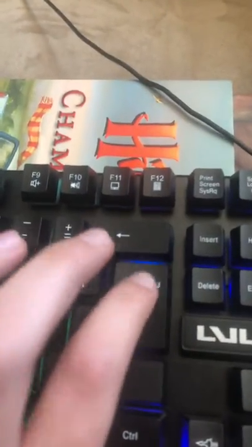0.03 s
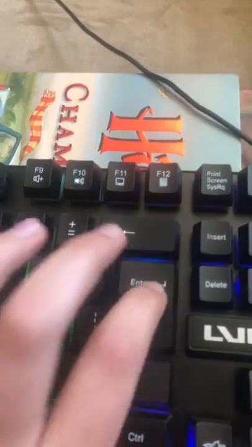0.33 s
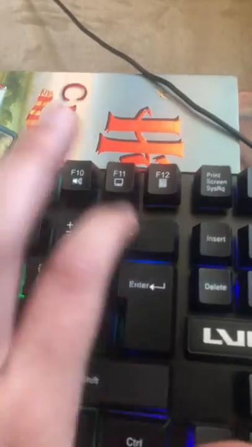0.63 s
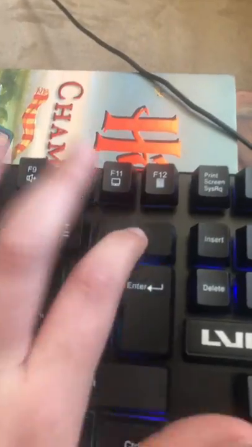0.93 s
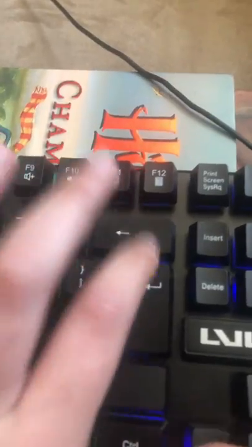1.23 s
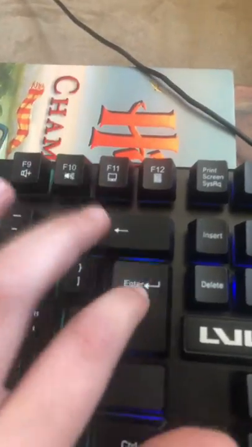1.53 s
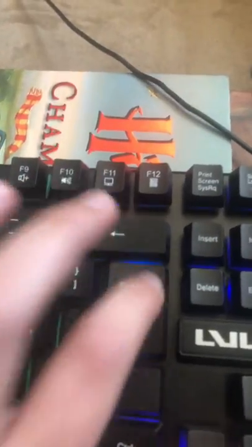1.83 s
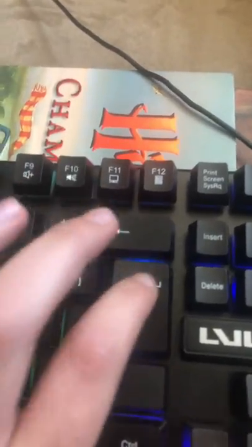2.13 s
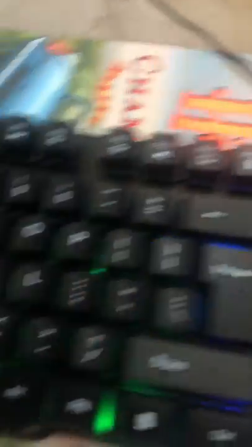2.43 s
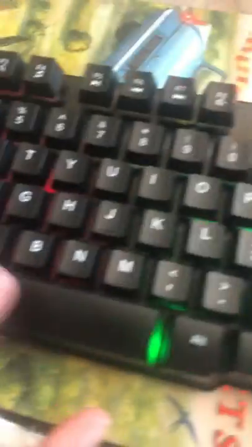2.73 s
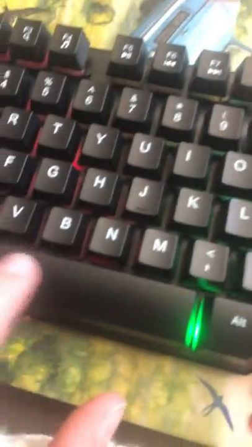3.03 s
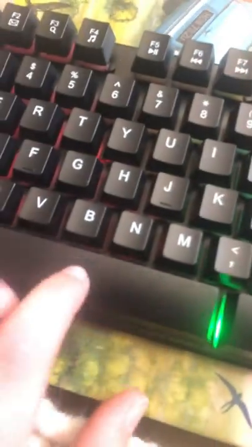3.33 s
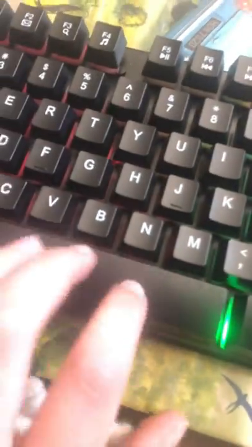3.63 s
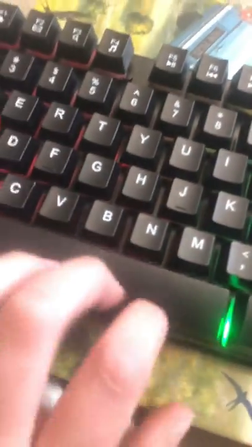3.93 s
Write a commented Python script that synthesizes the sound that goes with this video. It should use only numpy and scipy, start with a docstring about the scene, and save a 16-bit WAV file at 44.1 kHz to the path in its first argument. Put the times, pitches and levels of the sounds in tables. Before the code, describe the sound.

Typing on a plastic keyboard, heard up close in a quiet room. Light clicks of keys going down and springing back come first, then faint handling noise, then quick, sharper space bar clacks with hollow knocks.

```python
"""Close by in a quiet room, fingers tap the keys of a plastic keyboard: each key lands softly on its
rubber dome, then snaps back up against its stop, ringing the cap and the case.
At about 2.3 s the typing ends and a faint, low swell of rubbing and handling noise follows.
From 2.8 s the space bar is struck again and again: its loose bar and stabiliser wire clack and rattle,
the hollow case knocks, and the keyboard thuds on the desk."""
import sys
import numpy as np
from scipy import signal
from scipy.fft import rfft, irfft, next_fast_len
from scipy.io import wavfile

SR = 44100
rng = np.random.default_rng(int(sys.argv[2]) if len(sys.argv) > 2 else 0)


def transcribe(signal):
    """Save signal, clipped to [-1, 1], as a 16-bit WAV file at the path in sys.argv[1]."""
    frames = np.atleast_2d(signal).T
    limited = np.clip(frames, -1, 1)
    pcm = np.round(limited * 32767).astype(np.int16)
    wavfile.write(sys.argv[1], SR, pcm)


N = 176400
T = np.arange(SR // 4) / SR  # time axis of one hit [s]

# noise colours of the room tone and the handling noise (frequency [Hz], level [dB])
AIR_SPECTRUM = [(24, -32), (40, -8), (130, -2.5), (412, -11), (680, -11.5), (1270, -19), (2300, -24.5),
                (3930, -22), (16000, -33.5)]
RUSTLE_SPECTRUM = [(60, -4), (140, 8), (600, -2), (2000, -8), (12000, -25)]
# fader curve of the handling noise (time [s], level [dB])
RUSTLE_CURVE = [(2.299, -70), (2.36, -66.5), (2.45, -64.5), (2.58, -72.5), (2.8, -77)]
# early echoes off nearby surfaces (delay [s], level [dB])
EARLY_ECHOES = [(.0102, -15), (.0172, -15)]
# decay of the room (frequency [Hz], t60 [s])
ROOM_DECAY = [(500, 0.17), (2000, 0.28), (5000, 0.25), (14000, 0.22)]

# noise colours of the contacts on case, key, bar and wire (frequency [Hz], level [dB])
HOLLOW_SPECTRUM = [(250, 1), (500, 0), (750, 1), (900, -7.5), (1180, 0.5), (1450, -7), (1700, -1.5),
                   (2600, -22.5)]
KEY_TICK_SPECTRUM = [(1000, -5.5), (2100, -3.5), (2800, 2.5), (4500, 0), (6000, -10), (7500, -7),
                     (9000, -17.5), (12500, -18.5), (16000, -24)]
BAR_CRACK_SPECTRUM = [(1200, -15), (2100, -14.5), (2850, 5), (3250, -8), (3800, -1), (4800, -2),
                      (5500, -21.5), (7000, -19.5)]
WIRE_TICK_SPECTRUM = [(3500, -19), (5500, 11.5), (7500, 6.5), (9300, 2), (10500, -4.5), (13800, 1.5),
                      (16000, -29.5)]
# modes of a keycap's body, its thin rim, the space bar and its wire (frequency [Hz], level [dB], t60 [s])
CAP_MODES = [(1275, -1.5, 0.01), (1468, 0.5, 0.0091), (1835, -8.5, 0.0032)]
RIM_MODES = [(2595, 4.5, 0.0136), (3574, 6, 0.018), (4296, 6.5, 0.011), (6010, -1.5, 0.035),
             (7540, -4, 0.042)]
BAR_MODES = [(2596, -5, 0.037), (2883, -0.5, 0.015), (3630, 3, 0.017), (4050, 3, 0.022), (4370, -2, .03),
             (4806, 1.5, 0.034), (5090, -17, 0.054)]
WIRE_MODES = [(5350, -16, 0.13), (9270, 5, 0.032), (13600, 6, 0.033)]

# Cue lists: levels are before each layer's own trim.
# the keyboard bumping the desk (time [s], level [dB], pitch [Hz])
DESK_BUMPS = [(1.34, -53.5, 157), (3.164, -55.5, 129), (3.53, -50.5, 110), (3.68, -47, 85),
              (3.826, -47.5, 84), (3.976, -48, 140.5)]
# the space bar reaching either end of its travel (time [s], level [dB], pitch [Hz], hollow knock [dB])
CASE_THUDS = [(3.148, -49.5, 338, -77), (3.169, -60, 280, -57), (3.2158, -43, 330, -50),
              (3.355, -57, 284, -57.5), (3.419, -41.5, 297, -46), (3.513, -49.5, 310, -52),
              (3.537, -44, 320, -47), (3.572, -43.0, 310, -51), (3.669, -51.5, 234, -51),
              (3.7161, -40, 314, -48.5), (3.821, -44, 223, -38), (3.868, -39, 314, -45.5),
              (3.9713, -45.5, 186, -37)]
# keys landing (time [s], cap [dB], case [dB], thump [dB], tick [dB], case pitch [Hz], cap pitch [Hz])
KEY_PRESSES = [(0.1351, -63, -53.5, -58.5, -63.5, 674, 1570), (0.3067, -57, -47, -54, -61, 572, 1380),
               (0.5551, -46, -50, -56, -56.5, 698, 1307), (0.7634, -49.0, -52, -54, -56.5, 722, 1240),
               (0.9369, -56, -55, -55.5, -63, 676, 1220), (1.552, -60, -55.5, -64, -62, 670, 1440),
               (1.7458, -62.5, -50, -57.5, -61.5, 657, 1550), (1.917, -56, -51, -57, -64.5, 586, 1730),
               (2.073, -60, -53, -59.5, -66, 645, 1490), (2.232, -65, -61.5, -73, -72, 714, 1300)]
# a loose cap rattling as its key moves (time [s], level [dB])
CAP_RATTLES = [(0.333, -62.5), (0.5603, -54), (0.8315, -65)]
# keys springing back (time [s], cap [dB], case [dB], thump [dB], tick [dB], case pitch [Hz],
# cap pitch [Hz], snap pitch [Hz], contact time [s])
KEY_RELEASES = [(0.029, -47.5, -54.5, -55, -60.5, 750, 1410, 2460, 0.00089),
                (0.202, -48, -45.5, -50, -60.5, 656, 1464, 3200, 0.00027),
                (0.39, -47, -46, -49, -57, 660, 1490, 2700, 0.00034),
                (0.661, -49, -43.0, -60.5, -54.5, 666, 1290, 3000, 0.00068),
                (0.841, -40.5, -43.5, -57, -52.5, 680, 1376, 2750, 0.0024),
                (1.0185, -48, -43.5, -59.5, -57, 676, 1435, 2700, 0.001),
                (1.097, -45, -44.5, -52, -52.5, 605, 1526, 5750, 0.00061),
                (1.1871, -47, -42.5, -54, -55.5, 705, 1410, 3130, 0.00082),
                (1.634, -44.5, -50.5, -49.5, -58, 825, 1490, 2420, 0.00021),
                (1.8142, -49.0, -49.5, -52.5, -61, 567, 1520, 4600, 0.00023),
                (1.9907, -49, -49, -51.5, -58.0, 730, 1480, 3600, 0.00024),
                (2.1541, -47.5, -47, -50.5, -59, 697, 1540, 3120, 0.0004),
                (2.268, -59.5, -65, -68, -70.5, 744, 1385, 2930, 0.0011),
                (2.3246, -44, -44, -53.5, -54.5, 620, 1490, 2510, 0.00031)]
# space bar contacts (time [s], bar [dB], wire [dB], strongest ring [Hz])
BAR_CLACKS = [(2.829, -44.5, -55.5, 4070), (2.8348, -51, -69, 3690), (2.85, -51.5, -70, 2900),
              (2.8545, -52.5, -69.5, 3050), (2.8595, -50.5, -64, 3990), (2.926, -58, -69, 2940),
              (2.948, -53.5, -80, 3680), (2.989, -65, -82, 3530), (3.1433, -37, -53.5, 3000),
              (3.159, -46, -57, 2800), (3.1704, -59, -66, 2840), (3.2147, -52, -60, 4200),
              (3.222, -43.5, -58, 3960), (3.231, -53, -58, 3640), (3.3507, -43.5, -49.5, 4670),
              (3.357, -44.5, -64, 4700), (3.364, -46, -57, 4250), (3.3789, -51.5, -67, 2900),
              (3.418, -43.5, -51.5, 3960), (3.4246, -38.5, -50.5, 2950), (3.4438, -46.5, -60, 3580),
              (3.51, -38, -56, 2920), (3.516, -43, -58, 2990), (3.5349, -32, -45.5, 2810),
              (3.543, -46, -48.5, 3980), (3.549, -50, -56, 3730), (3.572, -46.5, -48.5, 4070),
              (3.5775, -43, -52.5, 4740), (3.6216, -57.5, -68, 3740), (3.6661, -31, -48.5, 2967),
              (3.676, -58, -51, 2760), (3.7016, -45.5, -54, 2870), (3.719, -42.5, -49.5, 4720),
              (3.726, -45.5, -56, 4700), (3.757, -59, -72, 3730), (3.8145, -31, -47.5, 4534),
              (3.82, -32.5, -49, 4150), (3.8522, -51, -59, 3700), (3.8663, -46.5, -53.5, 4460),
              (3.8801, -47, -57, 4630), (3.9343, -58.5, -71, 3760), (3.965, -36, -46, 4070),
              (3.9696, -24, -42.5, 3730), (3.9763, -38, -55, 4770), (3.987, -50, -56, 4240)]

CAP_MODES_HZ = 1442  # pitch of the untransposed keycap
DOWN_THUMP_HZ, UP_THUMP_HZ = 160.6, 405
SLIDE_S = .01  # scrape leading into a contact


def amp(db):
    """Decibels to gain."""
    return 10 ** (np.asarray(db) / 20)


def along(points, hz):
    """Read a (frequency, value) curve on a log frequency axis."""
    freqs, values = np.transpose(points)
    return np.interp(np.log(hz + 1), np.log(freqs + 1), values)


def noise(spectrum, size):
    """Coloured noise of rms 1."""
    colour = amp(along(spectrum, np.fft.rfftfreq(size, 1 / SR)))
    x = irfft(rfft(rng.standard_normal(size)) * colour, size)
    return x / x.std()


def unit_hit(x):
    """Scale a short sound to the energy of 10 ms at rms 1."""
    return x * np.sqrt(.01 * SR / (np.sum(x * x) + 1e-20))


def add(track, at, x):
    """Mix x into the track at a time in seconds."""
    i = max(round(at * SR), 0)
    track[i:i + len(x)] += x[:max(N - i, 0)]


def envelope(rise, t60):
    """Attack and exponential decay, both in seconds."""
    return (1 - np.exp(-T / rise)) * amp(-60 * T / t60)


def ring(hz, rise, t60):
    """One damped mode; the longer the contact, the softer its attack and the purer its tone."""
    attack = 1 - np.exp(-(T / rise) ** 2)
    return unit_hit(np.sin(2 * np.pi * hz * T) * attack * amp(-60 * T / t60))


def chime(modes, rise, scatter_db, detune):
    """An object's modes, their balance and pitch a little different at each touch."""
    out = np.zeros(len(T))
    for hz, db, t60 in modes:
        level, polarity, pitch = rng.standard_normal(3)
        out += amp(db + scatter_db * level) * np.sign(polarity) * ring(hz * (1 + detune * pitch), rise, t60)
    return unit_hit(out)


def burst(spectrum, rise, t60, chatter_db, chatter_t60):
    """A crack of noise followed by weaker, grainy chatter."""
    knots = T[::64]
    grain_db = 7 * np.interp(T, knots, rng.standard_normal(len(knots)))
    chatter = amp(chatter_db + grain_db) * envelope(rise, chatter_t60)
    return unit_hit(noise(spectrum, len(T)) * (envelope(rise, t60) + chatter))


def slide(spectrum):
    """A short scrape that swells up to a contact."""
    size = int(SLIDE_S * SR)
    return unit_hit(noise(spectrum, size) * np.linspace(0, 1, size) ** 3)


def room_tone():
    """A bed of still room air."""
    return amp(-69.5) * noise(AIR_SPECTRUM, N)


def room(x, wet_db):
    """Add a short diffuse tail that lingers longest in the upper mids."""
    hz, t, bins = signal.stft(rng.standard_normal(SR // 2), SR, nperseg=256)
    decay = amp(-60 * t / along(ROOM_DECAY, hz)[:, None])
    onset = 1 - np.exp(-t / .0015)
    tail = signal.istft(bins * decay * onset, SR, nperseg=256)[1]
    return x + amp(wet_db) * signal.fftconvolve(x, tail / np.linalg.norm(tail))[:N]


def early_echoes(x):
    """Nearby surfaces throw back the bright part of the sound."""
    bright = signal.sosfilt(signal.butter(1, 800, 'high', fs=SR, output='sos'), x)
    out = x.copy()
    for delay, db in EARLY_ECHOES:
        add(out, delay, amp(db) * bright)
    return out


def handling_rustle():
    """A faint, low swell of rubbing and handling noise after the typing ends."""
    times, levels = np.transpose(RUSTLE_CURVE)
    fader_db = np.interp(np.arange(N) / SR, times, levels, left=-np.inf, right=-np.inf)
    return amp(fader_db) * noise(RUSTLE_SPECTRUM, N)


def desk_bumps():
    """The low end: the whole keyboard rocks softly on the desk."""
    out = np.zeros(N)
    for at, db, hz in DESK_BUMPS:
        add(out, at, amp(db - 2) * ring(hz, rise=.0045, t60=.15))
    return out


def case_thuds():
    """The space bar knocks on the hollow case, which hums briefly."""
    out = np.zeros(N)
    for at, db, hz, knock_db in CASE_THUDS:
        knock = burst(HOLLOW_SPECTRUM, rise=.0003, t60=.019, chatter_db=-15, chatter_t60=.11)
        hum = ring(hz, rise=.0016, t60=.019) + amp(-7) * ring(1.336 * hz, rise=.00072, t60=.016)
        add(out, at - .002, amp(knock_db) * knock)
        add(out, at, amp(db - .5) * hum)
    return out


def keycap(pitch_hz, rise):
    """The plastic body of a click: the cap's modes, transposed for the size of the key."""
    modes = [(hz * pitch_hz / CAP_MODES_HZ, db, t60) for hz, db, t60 in CAP_MODES]
    return chime(modes, rise, scatter_db=5.5, detune=.028)


def key_presses():
    """The finger ticks on the cap, then the key lands on its rubber dome and thumps the case."""
    out = np.zeros(N)
    for at, cap_db, case_db, thump_db, tick_db, case_hz, cap_hz in KEY_PRESSES:
        touch = chime(RIM_MODES, rise=.00089, scatter_db=0, detune=.077)
        tick = burst(KEY_TICK_SPECTRUM, rise=.00047, t60=.028, chatter_db=-29, chatter_t60=.063)
        thump = ring(DOWN_THUMP_HZ, rise=.003, t60=.053) + amp(-3.5) * ring(364, rise=.0016, t60=.028)
        add(out, at - .0035, amp(tick_db - 4) * touch)
        add(out, at, amp(tick_db) * tick)
        add(out, at, amp(cap_db) * keycap(cap_hz, rise=.0023))
        add(out, at + .0013, amp(case_db + 2.5) * ring(case_hz, rise=.0009, t60=.027))
        add(out, at + .0014, amp(thump_db + 4) * thump)
    return out


def cap_rattles():
    """A loose cap gives a thin, bright click as its key moves."""
    out = np.zeros(N)
    for at, db in CAP_RATTLES:
        add(out, at, amp(db) * chime(RIM_MODES, rise=.000197, scatter_db=1, detune=.043))
    return out


def key_releases():
    """The cap slides up and snaps against its stop; the lower modes of the case answer a moment later."""
    out = np.zeros(N)
    for at, cap_db, case_db, thump_db, tick_db, case_hz, cap_hz, snap_hz, contact_s in KEY_RELEASES:
        add(out, at - SLIDE_S, amp(cap_db - 19.5) * slide(HOLLOW_SPECTRUM))
        add(out, at - SLIDE_S, amp(tick_db - 11) * slide(KEY_TICK_SPECTRUM))
        tick = burst(KEY_TICK_SPECTRUM, rise=.0005, t60=.014, chatter_db=-14, chatter_t60=.05)
        rim = chime(RIM_MODES, contact_s, scatter_db=4.5, detune=.0596)
        snap = ring(snap_hz, contact_s, t60=.0059)
        thump = ring(UP_THUMP_HZ, rise=.00071, t60=.013) + amp(-12) * ring(177, rise=.002, t60=.042)
        add(out, at - .0005, amp(tick_db - 2) * tick)
        add(out, at, amp(tick_db - 5) * (rim + snap))
        add(out, at, amp(cap_db) * keycap(cap_hz, contact_s))
        add(out, at + .00068, -amp(case_db) * ring(case_hz, rise=.00078, t60=.014))
        add(out, at + .001826, amp(thump_db + 2.5) * thump)
    return out


def space_bar():
    """Each contact cracks and rings the bar, most at the struck spot's pitch, and rattles the wire."""
    out = np.zeros(N)
    for at, bar_db, wire_db, spot_hz in BAR_CLACKS:
        add(out, at - SLIDE_S, amp(bar_db - 12.5) * slide(KEY_TICK_SPECTRUM))
        crack = burst(BAR_CRACK_SPECTRUM, rise=.00018, t60=.0072, chatter_db=-23.5, chatter_t60=.079)
        bar_ring = chime(BAR_MODES, rise=.0006, scatter_db=2.5, detune=.0086)
        wire_tick = burst(WIRE_TICK_SPECTRUM, rise=.0017, t60=.0033, chatter_db=-19, chatter_t60=.11)
        wire_ring = chime(WIRE_MODES, rise=.0003, scatter_db=2, detune=.02)
        add(out, at - .0003, amp(bar_db - 7) * crack)
        add(out, at - .001, amp(bar_db - 6) * ring(spot_hz, rise=.0012, t60=.011))
        add(out, at - .0005, amp(bar_db - 8) * bar_ring)
        add(out, at - .001, amp(wire_db - 2.5) * wire_tick)
        add(out, at - .0005, amp(wire_db - 9) * wire_ring)
    return out


def scene():
    """Mono mix: fairly dry keys, then a wetter space bar and low end, over the room tone."""
    typing = key_presses() + cap_rattles() + key_releases()
    keys = room(early_echoes(typing), wet_db=-14)
    bar = room(space_bar(), wet_db=-10.5)
    low_end = room(case_thuds() + desk_bumps(), wet_db=-10)
    return (keys + bar + low_end + room_tone() + handling_rustle())[None]


def record(dry):
    """The small microphone loses the deep bass; a brick-wall cut takes off the very top."""
    low_cut_hz, high_cut_hz = 54, 16450
    thin = signal.sosfilt(signal.butter(4, low_cut_hz, 'high', fs=SR, output='sos'), dry)
    size = next_fast_len(N + SR // 2)
    passband = np.fft.rfftfreq(size, 1 / SR) < high_cut_hz
    return irfft(rfft(thin, size) * passband, size)[..., :N]


dry = scene()
out = record(dry)
transcribe(out)
```